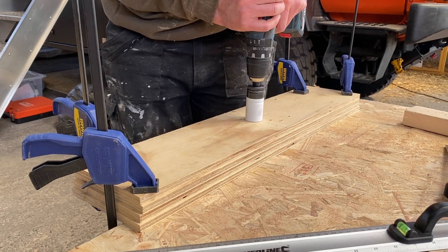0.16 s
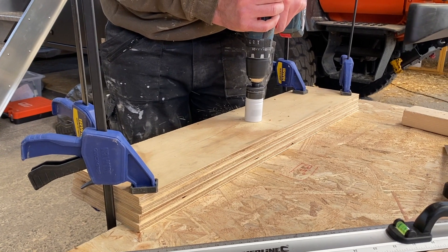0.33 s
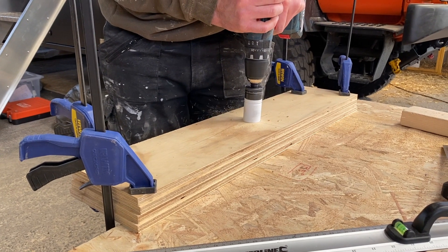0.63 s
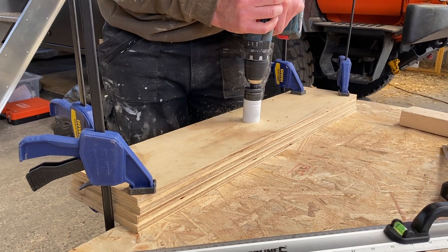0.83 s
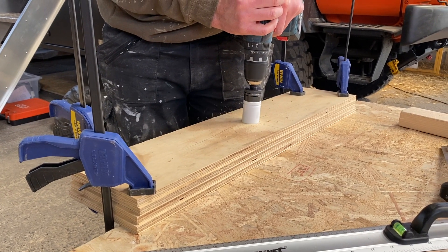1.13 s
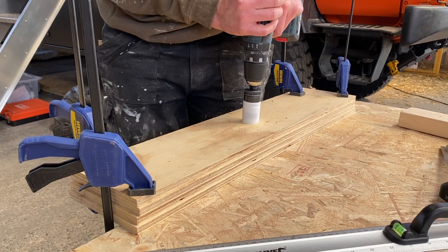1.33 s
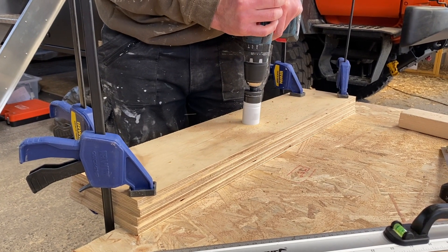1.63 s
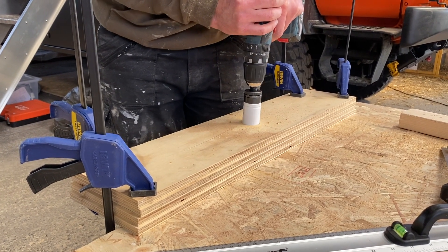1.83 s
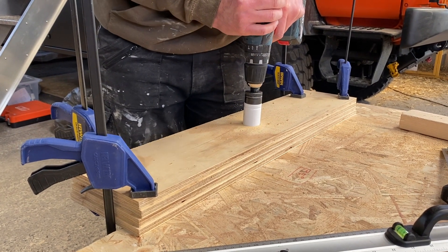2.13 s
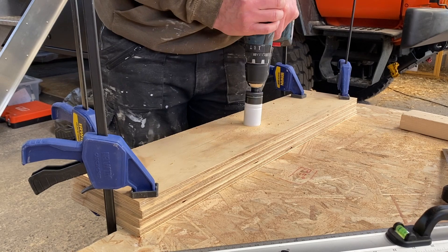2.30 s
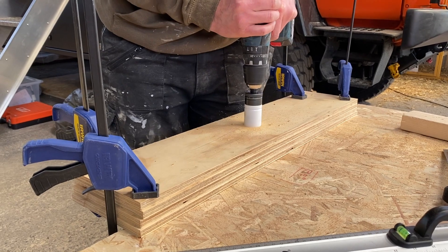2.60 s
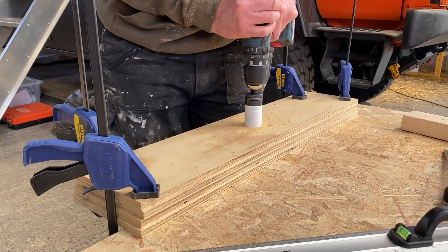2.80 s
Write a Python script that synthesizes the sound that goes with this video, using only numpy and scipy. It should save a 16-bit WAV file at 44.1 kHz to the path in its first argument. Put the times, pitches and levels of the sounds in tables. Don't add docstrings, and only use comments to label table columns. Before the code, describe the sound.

Close stereo phone pickup in an echoing barn: trigger ticks, high gear whine and fan hiss, hole saw scraping and drumming on clamped wood, a brief pause, a second run, with a far engine droning low.

```python
import sys
import numpy as np
from scipy import signal
from scipy.fft import rfft, irfft, next_fast_len
from scipy.io import wavfile
from scipy.ndimage import uniform_filter1d, map_coordinates

SR = 44100
rng = np.random.default_rng(int(sys.argv[2]) if len(sys.argv) > 2 else 0)


def materialize(psi):
    bounded = np.clip(np.atleast_2d(psi).T, -1, 1)
    quanta = np.round(bounded * 32767).astype(np.int16)
    wavfile.write(sys.argv[1], SR, quanta)


def to_linear_factor(level_db):
    exponent = np.asarray(level_db, float) / 20
    return 10 ** exponent


N = 130095
TIME = np.arange(N) / SR


def unit(x):
    return x / np.sqrt(np.mean(x ** 2) + 1e-20)


def along(points, hz):
    f, v = np.transpose(points)
    return np.interp(np.log(hz + 1), np.log(f + 1), v)


def curves(rows):
    s, *columns = np.transpose(rows)
    return [np.interp(TIME, s, column) for column in columns]


def wobble(rate):
    knots = rng.standard_normal(int(N * rate / SR) + 4)
    return map_coordinates(knots, [np.arange(N) * rate / SR])


def filtered(x, response):
    m = next_fast_len(N + SR // 2)
    return irfft(rfft(x, m) * response(np.fft.rfftfreq(m, 1 / SR)), m)[..., :N]


def noise(spectrum):
    colour = lambda hz: to_linear_factor(along(spectrum, hz)) * (hz > 20)
    return unit(filtered(rng.standard_normal(N), colour))


def turns(hz):
    return 2 * np.pi * np.cumsum(hz) / SR


def spread(mid, other, alike):
    angle = lambda hz: np.arccos(np.clip(along(alike, hz), -1, 1)) / 2
    shares = lambda hz: np.array([np.cos(angle(hz)), np.sin(angle(hz))])
    m, s = filtered(np.array([mid, other]), shares)
    return np.array([m + s, m - s])


# t/s, firing f/Hz, level/dB, brightness/dB per order
ENGINE_PACE = [(0, 100.2, -35, -1), (.3, 100.3, -38, -3.5), (.55, 98.83, -56, 12), (.75, 98.9, -33.5, -4.5),
               (1.7, 97.83, -39, -2), (1.95, 99.4, -55.5, 7.5), (2.27, 100, -50, 6), (2.4, 132.7, -46, -6),
               (2.5, 131.5, -46, 3.5), (2.6, 125.1, -40, 0.5), (2.8, 126.5, -42, 3.5),
               (2.95, 126.2, -50, 5)]
# thirds of the firing rate, level/dB
ENGINE_ORDERS = [(2, -19.5), (3, 0.5), (4, -13.5), (5, -10), (6, -8), (9, -19), (12, -25.5)]
PIPE_HZ, PIPE_WIDTH_HZ, PIPE_DB = 248.3, 31, 8.5


def engine():
    hz, db, bright = curves(ENGINE_PACE)
    phase = turns(hz * (1 + 0.0045 * wobble(12))) / 3
    out = np.zeros(N)
    for k, level in ENGINE_ORDERS:
        pipe = PIPE_DB * np.exp(-((k * hz / 3 - PIPE_HZ) / PIPE_WIDTH_HZ) ** 2)
        tone_db = db + level + bright * (k / 3 - 0.5) + pipe + 0.7 * wobble(13)
        out += to_linear_factor(tone_db) * np.sin(k * phase + k * k)
    return out


# f/Hz, level/dB per Hz
RUMBLE_COLOUR = [(15, -82.5), (25, -38.5), (86, -3.5), (203, -14), (229, -10), (301, -10), (366, -16),
                 (1140, -25), (9000, -60), (11700, -99), (19800, -120)]
# t/s, level/dB
RUMBLE_LEVEL = [(.1, -39.5), (.5, -41.5), (1.7, -45.5), (2.05, -46), (2.2, -43), (2.4, -35.5), (2.6, -40.5),
                (2.95, -43.5)]
# f/Hz, likeness (0-1)
RUMBLE_ALIKE = [(30, .95), (100, 0.76), (300, 0.77), (700, 0.083), (5000, 0.1)]


def rumble():
    pair = spread(noise(RUMBLE_COLOUR), noise(RUMBLE_COLOUR), RUMBLE_ALIKE)
    return to_linear_factor(curves(RUMBLE_LEVEL)[0] + 1.17 * wobble(12)) * pair


# t/s, level/dB, f/Hz
TICKS = [
    (.013, -48, 6370),
    (0.048, -45, 4460),
    (0.052, -47, 12240),
    (2.129, -61, 12600),
]
TICK_T60_S = 0.012


def trigger():
    out, t = np.zeros(N + SR), np.arange(SR // 20) / SR
    for s, db, hz in TICKS:
        tick = np.sin(2 * np.pi * hz * t) + 0.37 * rng.standard_normal(len(t))
        out[round(s * SR):][:len(t)] += to_linear_factor(db - 60 * t / TICK_T60_S) * tick
    return out[:N]


# t/s, gear whine f/Hz, level/dB, teeth hum level/dB
MOTOR_RUN = [(0, 883.4, -96, -83), (.095, 1050, -44.5, -80), (.14, 2007, -30, -57.5),
             (.205, 3739, -32.5, -38), (.6, 3765, -34.5, -35), (.9, 3796, -34, -32.5),
             (1.2, 4037, -35, -46), (1.5, 4070, -36.5, -40), (1.65, 4000, -37, -62.5),
             (1.7, 3542, -73, -87), (2.17, 894.4, -87, -97), (2.185, 1195, -46.5, -73),
             (2.225, 2139, -37, -64), (2.31, 3450, -30, -50), (2.4, 3810, -31.5, -39),
             (2.52, 3774, -31, -50.5), (2.6, 3650, -32, -44.5), (2.95, 3678, -32, -54.5)]
# multiple of the whine, level/dB, unsteadiness (share), flutter/dB
GEAR_WHINE = [(1, -8.5, .065, 5), (2, -21, 0.02, 5), (3, -25, 0.008, 3.5)]
# multiple of the whine, level/dB
SPIN_UP_TONES = [(1, -8), (2, -9), (3, -15)]
# f/Hz, level/dB per Hz
FAN_HISS = [(150, -11.5), (500, -3), (1500, -7.5), (3100, -6), (3850, -0.5), (4800, -8), (12500, -13.5),
            (15500, -22.5)]
# f/Hz, width/Hz, level/dB
VENT_WHISTLE = [(13160, 510, 11.5)]
FULL_SPEED_HZ, BRIGHT_HZ = 3600, 2200
FULL_PULL_HZ_S = 20110
TOP_WHINE_DB, SECOND_START_S = 16.5, 2.1
SWING_SHARE, SWING_DB = 0.0043, 0.5


def motor():
    hz, db, _ = curves(MOTOR_RUN)
    slow = np.clip(1 - hz / FULL_SPEED_HZ, 0, 1)
    top_db = TOP_WHINE_DB * (TIME > SECOND_START_S) - 40 * slow
    whine = np.zeros(N)
    for k, level, rough, flutter_db in GEAR_WHINE:
        tone_db = level + top_db * (k > 2.5) - 20 * slow + flutter_db * wobble(150)
        whine += to_linear_factor(tone_db) * np.sin(k * turns(hz * (1 + rough * wobble(250))))

    speed_gain = uniform_filter1d(np.gradient(hz) * SR, size=1000)
    pull = np.clip(speed_gain / FULL_PULL_HZ_S, 0, 1)
    for k, level in SPIN_UP_TONES:
        tone_db = level + along(FAN_HISS, k * hz) + 6.2 * wobble(80)
        whine += pull * to_linear_factor(tone_db) * np.sin(k * turns(hz * (1 + 0.019 * wobble(90))))

    vent = lambda f: to_linear_factor(sum(top * np.exp(-((f - c) / w) ** 2) for c, w, top in VENT_WHISTLE))
    hiss = filtered(noise(FAN_HISS), vent)
    dull = uniform_filter1d(hiss, size=12)
    hiss = dull + (hiss - dull) * np.clip(hz / BRIGHT_HZ, 0, 1) ** 2
    swing = SWING_DB * np.sin(turns(hz * SWING_SHARE)) + 0.79 * wobble(29.77) + 0.19 * wobble(400)
    return to_linear_factor(db + swing) * (hiss + whine)


# t/s,
# level/dB, f/Hz, t60/s
KNOCKS = [(.197, -17.5, 3695, .06), (.233, -21, 602, .05), (.236, -23.5, 538, 0.15),
          (.278, -15.5, 478, 0.1), (.278, -19, 915, 0.08), (.88, -25, 635, 0.098),
          (.927, -14.5, 654, 0.098), (.933, -18, 700, 0.11), (.975, -20.5, 630, 0.11),
          (1.025, -25, 636, 0.14), (1.44, -30.5, 558.5, .08), (1.482, -29.5, 525, 0.096),
          (1.53, -31, 503.3, 0.14), (1.575, -30, 507, 0.077), (1.616, -24.5, 519.3, .1),
          (1.618, -30.5, 383.5, 0.13), (1.62, -32, 623, 0.084)]


def knocks():
    out, t = np.zeros(N + SR), np.arange(SR // 5) / SR
    for s, db, hz, t60 in KNOCKS:
        swell = np.clip(t / 0.00656, 0, 1)
        out[round(s * SR):][:len(t)] += to_linear_factor(db - 60 * t / t60) * swell * np.sin(2 * np.pi * hz * t)
    return out[:N] * to_linear_factor(1.4 * wobble(72))


# t/s, rasp level/dB,
# board level/dB, board f/Hz, length/s
SAW_BITES = [(0.233, -14, -23.5, 420.3, 0.016), (0.276, -13, -28, 410.5, 0.012),
             (.293, -20.5, -41, 419.4, 0.0048), (0.329, -16.5, -26.5, 398.6, 0.013),
             (0.384, -23.5, -27, 366.6, 0.006), (0.421, -14, -32, 403.4, 0.01),
             (0.465, -13.5, -25, 403.6, 0.0081), (0.509, -16, -27.5, 382.5, 0.0089),
             (0.55, -17, -28, 374.3, 0.0099), (.593, -17.5, -29, 392.2, 0.011),
             (0.634, -19, -28, 375, 0.015), (0.679, -19.5, -26.5, 384.4, 0.011),
             (0.723, -23.5, -29.5, 369, 0.024), (0.766, -25.5, -32.5, 367.4, 0.036),
             (0.816, -21.5, -33.5, 357, 0.019),
             (0.864, -22.5, -29.5, 369, 0.019), (0.922, -18, -33, 378.7, 0.017),
                (0.965, -23, -30, 389.1, 0.013), (1.015, -20, -29, 401.8, 0.0091),
                (1.057, -24.5, -27, 406, 0.013), (1.104, -25, -28, 409.5, 0.012),
                (1.156, -29.5, -27, 409, 0.012), (1.2026, -30.5, -32, 407, 0.011),
                (1.247, -29, -35, 400, 0.011), (1.3, -39.5, -43.5, 400, 0.017),
                (1.345, -40.5, -39.5, 405, 0.016), (1.392, -48, -39, 410, 0.019),
                (1.441, -40.5, -39, 418, 0.017), (1.487, -41, -45.5, 429, 0.019),
                (1.531, -43, -46, 436.4, 0.022), (1.572, -43.5, -40, 440, 0.013),
                (2.442, -29.5, -52, 424, 0.024), (2.511, -30, -37, 427.3, 0.017),
                (2.693, -36, -41.5, 432, 0.018)]
BITE_RISE_S, BITE_FALL_S, RASP_DB = .0022, .0035, -8
DRUM_RISE_S, DRUM_T60_S, DRUM_DB = .011, 0.056, 3
GLIDE, GLIDE_S = 0.11, .03
TEETH_ROUGH = 0.028


def bites():
    all_bites = SAW_BITES
    rasp, drum, climb = np.zeros((3, N + SR))
    t = np.arange(SR // 8) / SR
    for s, db, board_db, _, hold in all_bites:
        start = round(s * SR)
        late = np.maximum(t - hold, 0)
        climb[start:][:len(t)] = np.clip(t / GLIDE_S, 0, 1) - .5
        rasp[start:][:len(t)] += to_linear_factor(db + RASP_DB) * np.clip(t / BITE_RISE_S, 0, 1) * np.exp(-late / BITE_FALL_S)
        drum[start:][:len(t)] += to_linear_factor(board_db + DRUM_DB - 60 * late / DRUM_T60_S) * np.clip(t / DRUM_RISE_S, 0, 1)
    glide = GLIDE * uniform_filter1d(climb[:N], size=300)
    teeth = turns(curves(all_bites)[2] * (1 + glide + TEETH_ROUGH * wobble(100)))
    return rasp[:N], drum[:N], teeth


# f/Hz, width/Hz, level/dB
CUP_TONES = [(915, 34, -0.5), (1678, 104, -5.5), (2053, 90, -23.5), (3490, 220, -2), (4700, 79, -2.5),
             (5780, 170, -5.5), (6070, 160, -3), (7960, 125, -26.5), (10800, 1200, -24), (14800, 250, -7.5)]
CUP_DB, CUP_FADES_DB_S = -0.5, 8


def ring_cup(gate):
    def cup(f):
        total = 0
        for k, (c, w, db) in enumerate(CUP_TONES):
            total = total + (-1) ** k * to_linear_factor(db) * 1j * f * w / (c * c - f * f + 1j * f * w)
        return total

    white = rng.standard_normal(N)
    ring = filtered(white * gate, cup) / np.std(filtered(white, cup))
    return to_linear_factor(CUP_DB - CUP_FADES_DB_S * TIME) * ring


BOARD_UPPER_HZ, UPPER_DB, UPPER_FADES_DB_S = 486.5, -2, 5.5


def drum_board(drum, teeth):
    low_level = (drum + to_linear_factor(curves(MOTOR_RUN)[2])) * to_linear_factor(1.46 * wobble(110))
    upper_level = drum * to_linear_factor(UPPER_DB - UPPER_FADES_DB_S * TIME + 4.8 * wobble(60))
    upper = np.sin(turns(BOARD_UPPER_HZ * (1 + TEETH_ROUGH * wobble(100))))
    return low_level * np.sin(teeth) + upper_level * upper


# f/Hz, level/dB per Hz
RASP_COLOUR = [(250, -10), (1000, -2), (1700, 1), (3500, -5), (6000, -11.5), (9000, -8.5), (13500, -16.5),
               (15800, -12)]
GATE = 0.98


def saw():
    rasp, drum, teeth = bites()
    gate = unit(to_linear_factor(GATE * (np.sin(teeth) + wobble(500)))) * rasp
    return gate * noise(RASP_COLOUR) + ring_cup(gate) + drum_board(drum, teeth)


# f/Hz, t60/s
ECHO_T60 = [(200, 1), (900, .9), (2000, 0.75), (3900, .42), (6500, .55), (10000, 0.35)]


def echo(x):
    hz, t, z = signal.stft(rng.standard_normal((2, SR)), SR, nperseg=256)
    fade = to_linear_factor(-60 * t / along(ECHO_T60, hz)[:, None])
    tail = signal.istft(z * fade, SR, nperseg=256)[1]
    late = np.pad(x, (400, 0))[None]
    return signal.fftconvolve(late, tail / np.linalg.norm(tail[0]), axes=1)[:, :N]


# f/Hz, likeness (0-1)
DRILL_ALIKE = [(60, .95), (300, .9), (700, .68), (1500, .78), (3000, .78), (6000, .72), (7600, .9),
               (8700, .98), (10800, .99), (13500, .996), (15500, .99)]
ECHO_DB = -12


def scene():
    tool = motor() + saw() + knocks() + trigger()
    z = signal.stft(tool, nperseg=256)[2]
    shuffled = z * np.exp(2j * np.pi * rng.random(z.shape))
    twin = unit(signal.istft(shuffled, nperseg=256)[1][:N]) * np.std(tool)
    tail = to_linear_factor(ECHO_DB) * spread(*echo(tool), DRILL_ALIKE)
    return spread(tool, twin, DRILL_ALIKE) + tail + rumble() + engine()


def band_limit(x):
    return signal.sosfilt(signal.butter(12, 15780, fs=SR, output="sos"), x)


# f/Hz, left ahead by/radians
PORT_LEAD = [(0, 0), (2000, .1), (3200, 1.4), (4500, 1.2), (6200, -.6), (6700, 0), (7300, -2), (8200, -3),
             (9000, -3.3), (10100, -6.1), (11500, -6.4), (12900, -9.25), (14200, -9.55), (14600, -12.2),
             (15500, -12.7)]
# f/Hz, left over right level/dB
PORT_LEAN = [(60, -2), (200, -3), (380, 2), (700, 2), (1500, 2), (3000, 0.8), (6000, -2.5), (8000, 6.5),
             (11000, -3), (14000, 1.5)]
TOP_HZ = 15790


def record(dry):
    f, radians = np.transpose(PORT_LEAD)
    half = lambda hz: to_linear_factor(along(PORT_LEAN, hz) / 2) * np.exp(.5j * np.interp(hz, f, radians))
    ports = lambda hz: np.array([half(hz), 1 / half(hz)]) * (hz < TOP_HZ)
    return band_limit(filtered(dry, ports))


dry = scene()
out = record(dry)
materialize(out)
```